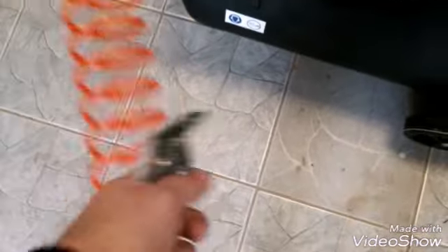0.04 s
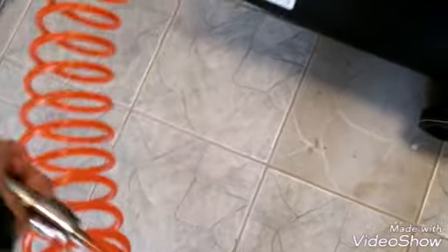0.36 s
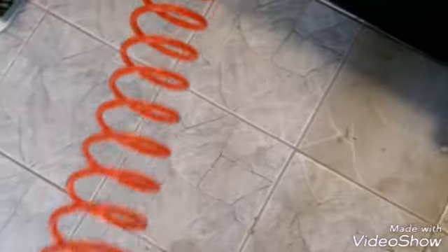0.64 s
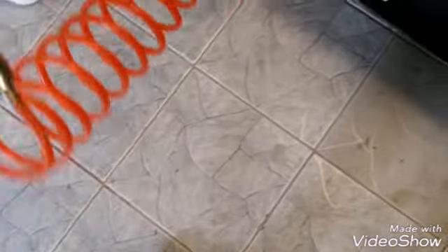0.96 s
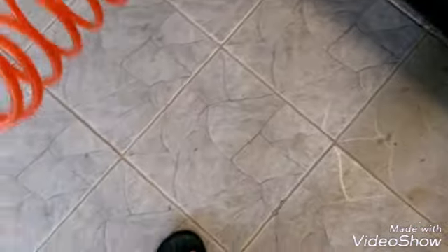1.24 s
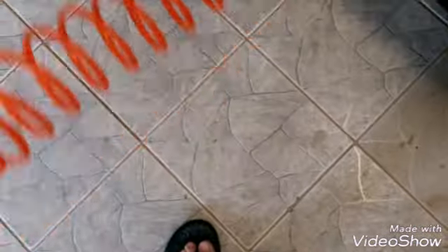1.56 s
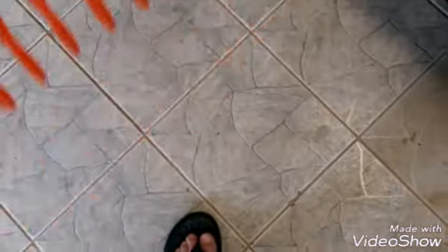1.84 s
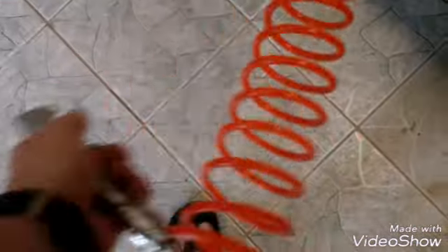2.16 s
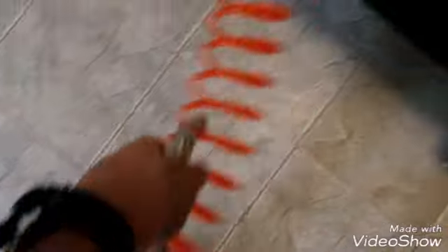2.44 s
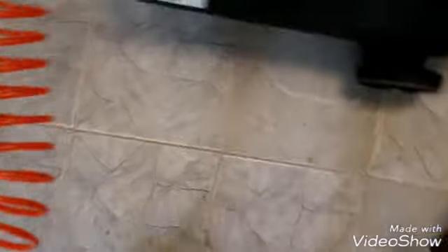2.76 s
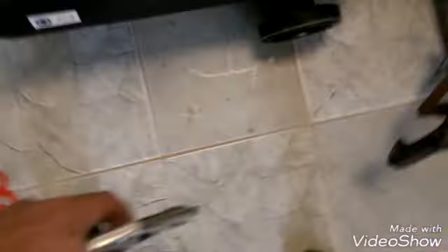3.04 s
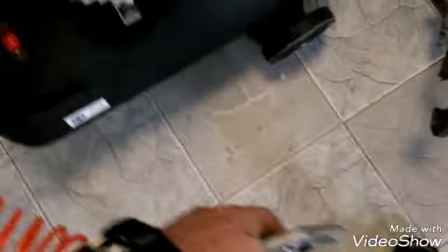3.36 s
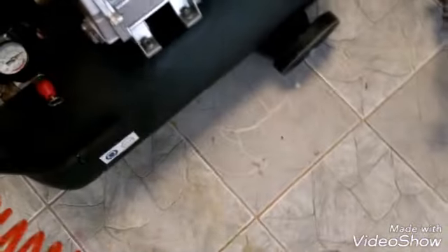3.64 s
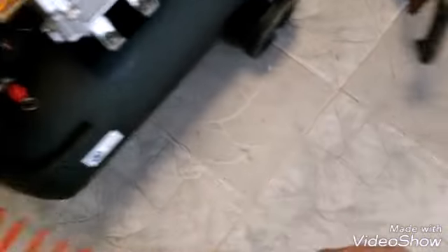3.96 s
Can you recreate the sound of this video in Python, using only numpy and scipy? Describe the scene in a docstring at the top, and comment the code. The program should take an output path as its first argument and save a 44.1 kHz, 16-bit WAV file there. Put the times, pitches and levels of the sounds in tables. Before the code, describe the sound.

An air nozzle blasts bright hiss six times in a tiled room, two longer blasts followed by two pairs of quick puffs. The nearby microphone catches a low wind rumble and two pops on its left side.

```python
"""In a tiled room, a hand-held nozzle fires short and long bursts of compressed air.
The rushing jet hisses. Its sound arrives directly, off the floor and the compressor's tank,
and from the ringing room. Stray air rumbles mostly on the left microphone port (its sound
opening) and pops on it twice. The recorder widens the stereo by subtracting from each side
a delayed copy of the other."""
import sys
import numpy as np
from scipy import signal
from scipy.fft import rfft, irfft, next_fast_len
from scipy.io import wavfile
from scipy.ndimage import uniform_filter1d, map_coordinates

SR = 44100
rng = np.random.default_rng(int(sys.argv[2]) if len(sys.argv) > 2 else 0)


def digitize_waveform(pressure):
    """Quantize a signal to 16-bit integers and store it at the path in sys.argv[1].

    Rows of a 2-D input are taken as channels; values are limited to [-1, 1].
    """
    field = np.atleast_2d(pressure).T
    bounded = np.clip(field, -1, 1)
    quanta = np.round(bounded * 32767).astype(np.int16)
    wavfile.write(sys.argv[1], SR, quanta)


N = 176400
LEAD = SR // 2  # samples of run-up, so that the room already rings
TIME = np.arange(-LEAD, N) / SR
LEFT_PORT_DB = -5  # the left port is shaded from the hiss

# Trigger pulls: start_s, stop_s, opening_s, level_db, direct_boost_db, floor_echo_ms,
# bright_pitch_hz, bright_boost_db
BURSTS = [(-.4, -0.046, 0.0036, -37.5, 0, 1.0, 6000, 2), (0.273, .702, 0.0052, -36, 0.5, 0.96, 7900, 2),
          (1.047, 2.031, 0.0058, -36.5, 0, 2.6, 5130, -0.5),
          (2.471, 2.639, 0.0053, -37, 6.5, 1.65, 5000, 4), (2.936, 3.06, 0.007, -38, 9, 0.6, 6800, 6),
          (3.71, 3.85, 0.0065, -38, 3, 2.8, 10000, 2.5), (3.99, 4.2, 0.0073, -41, 3, 2.14, 6000, 0)]
# Tone of air blowing on a port: pitch_hz, level_db
RUMBLE_TONE = [(25, -11.5), (60, -3), (130, 2.5), (220, -0.5), (450, -7.5), (900, -11), (1600, -10),
               (4000, -35)]


def amp(db):
    """Turn decibels into a volume factor."""
    return 10 ** (np.asarray(db) / 20)


def unit(x):
    """Scale a signal to an average power of 1."""
    return x / np.sqrt(np.mean(x ** 2) + 1e-20)


def along(points, hz):
    """Read between (pitch_hz, value) points on a musical (log) scale."""
    pitches, values = np.transpose(points)
    return np.interp(np.log(hz + 1), np.log(pitches + 1), values)


def wobble(per_s):
    """A smooth curve through per_s random values a second."""
    return map_coordinates(rng.standard_normal(2048), [(TIME - TIME[0]) * per_s], mode="wrap")


def filtered(x, response):
    """Scale and delay each pitch in x as response(hz) says."""
    size = x.shape[-1]
    padded = next_fast_len(size + SR // 4)
    return irfft(rfft(x, padded) * response(np.fft.rfftfreq(padded, 1 / SR)), padded)[..., :size]


def noise(tone, channels=2, size=len(TIME)):
    """A separate noise for each channel, shaped by a tone table."""
    white = rng.standard_normal((channels, size))
    return unit(filtered(white, lambda hz: amp(along(tone, hz))))


def valve(t, start, stop, opening_s, closing_s=0.011):
    """How far the valve is open, from 0 to 1; it is half open at start."""
    opening = .5 * (1 + np.tanh((t - start) / (2 * opening_s)))
    return opening * np.exp(-np.maximum(t - stop, 0) / closing_s)


def room_tone():
    """The faint, steady noise of the room."""
    # Tone of the quiet room: pitch_hz, level_db
    quiet_tone = [(25, 1), (150, -5.5), (670, -9), (1800, -4), (4600, -6.5), (10000, -17), (15000, -36)]
    return amp(-70.5) * noise(quiet_tone)


def stray_air():
    """Stray air rumbles on the ports in lumps, just after the valve opens."""
    # Strength of the draught while the valve is open: time_s, level_db
    draught = [(.3, -38.5), (.5, -43.5), (.68, -44.5), (1.15, -44.5), (1.38, -52.5), (1.75, -54.5),
               (2.0, -46), (2.47, -48), (2.53, -36), (2.62, -43), (3.0, -39.5), (3.06, -39.5),
               (3.75, -52.5), (4.0, -54.5)]
    lag_s, lump_db = 0.0046, 5.5
    blowing = sum(valve(TIME - lag_s, start, stop, opening_s, closing_s=0.0073)
                  for start, stop, opening_s, *_ in BURSTS)
    level_db = np.interp(TIME, *np.transpose(draught)) + lump_db * np.tanh(wobble(per_s=38))
    return blowing * amp(level_db) * noise(RUMBLE_TONE)


def pops():
    """The jet's edge hits a port: a quick pull and push of pressure, then swirling air."""
    # Hits on the port: start_s, level_db
    hits = [(0.374, -10.5), (2.9936, -15)]
    pitch_hz, rise_s, swirl_db = 215, 0.00026, -13.5
    swing_fade_s, swirl_fade_s = .02, 0.084  # time to fall by 60 dB
    out, t = np.zeros(len(TIME)), np.arange(SR // 10) / SR
    onset = 1 - np.exp(-t / rise_s)
    for start_s, level_db in hits:
        swing = -np.sin(2 * np.pi * pitch_hz * t) * amp(-60 * t / swing_fade_s)
        swirl = noise(RUMBLE_TONE, channels=1, size=len(t))[0] * amp(swirl_db - 60 * t / swirl_fade_s)
        out[LEAD + round(start_s * SR):][:len(t)] += amp(level_db) * onset * (swing + swirl)
    return out


def room_ring(sound):
    """The tiled room rings on; the middle pitches last longest."""
    # Time the ring takes to fall by 60 dB: pitch_hz, fade_s
    fade_times = [(150, 0.29), (1000, 0.49), (2500, 0.43), (5000, 0.45), (9000, .41), (15000, 0.34)]
    delay_s = 0.0031
    hz, t, bands = signal.stft(rng.standard_normal((2, SR * 3 // 4)), SR, nperseg=256)
    fade = amp(-60 * t / along(fade_times, hz)[:, None])
    tail = signal.istft(bands * fade, SR, nperseg=256)[1]
    tail *= np.clip(np.arange(tail.shape[1]) / SR / delay_s - 1, 0, 1)  # a short gap, then fade in
    return signal.fftconvolve(sound, tail / np.linalg.norm(tail[0]), axes=1)[:, :len(TIME)]


def echo(pair, t, delay_ms):
    """Bounced sound reaches both ports late, by a delay that can change."""
    return np.array([np.interp(t - delay_ms / 1000, t, port) for port in pair])


def nozzle_drift(pair):
    """As the nozzle moves, narrow bands of pitch swell and fade at random, alike in both ports."""
    depth_db = 1.78
    bands = signal.stft(pair, nperseg=512)[2]
    patches = uniform_filter1d(rng.standard_normal(bands.shape[1:]), size=3, axis=0)  # blur in pitch
    patches = uniform_filter1d(patches, size=16, axis=1)  # blur in time
    return signal.istft(bands * amp(depth_db * unit(patches)), nperseg=512)[1][:, :len(TIME)]


def jet_hiss():
    """Churning air hisses, following the valve and hose pressure; nearby echoes colour it."""
    # Tone of the hiss straight from the nozzle: pitch_hz, level_db
    jet_tone = [(60, -30.5), (400, -18), (900, -14.5), (1400, -11.5), (2200, -4), (3300, -4.5), (4600, -1),
                (6400, -2), (8000, -2), (9500, -5), (12000, -4), (14000, -7.5), (15300, -11)]
    # Tone of the hiss that fills the room: pitch_hz, level_db
    ring_tone = [(60, -9), (400, -16), (900, -15.5), (1500, -8.5), (2400, -1), (3300, -0.5), (4600, 0),
                 (6400, -1), (9000, -0.5), (12000, -2.5), (14000, -7), (15300, -9)]
    sag_db, sag_s = 2.5, 0.21  # the hose starts at full pressure and settles
    beam_octaves = 0.5  # width of the band that the nozzle aims at the microphone
    floor_share, tank_share, tank_ms, ring_db = 0.41, .4, 4.3, -0.5
    jet, near, flow = noise(jet_tone), np.zeros((2, len(TIME))), np.zeros(len(TIME))
    flutter_db = 0.42 * wobble(per_s=20)  # the jet is unsteady
    sway = 1 + 0.053 * wobble(per_s=3)  # the moving hand changes the echo delays
    for start, stop, opening_s, level_db, direct_db, floor_ms, bright_hz, boost_db in BURSTS:
        span = slice(*np.searchsorted(TIME, [start - .06, stop + .12]))
        t = TIME[span]
        pressure_db = sag_db * np.exp(-np.maximum(t - start, 0) / sag_s)
        level = valve(t, start, stop, opening_s) * amp(level_db + pressure_db + flutter_db[span])
        bright_band = lambda hz: np.exp(-.5 * (np.log2((hz + 1) / bright_hz) / beam_octaves) ** 2)
        beam = filtered(jet[:, span], lambda hz: amp(boost_db * bright_band(hz)))
        off_floor = floor_share * echo(beam, t, floor_ms * sway[span])
        off_tank = tank_share * echo(beam, t, tank_ms * sway[span])
        near[:, span] += level * amp(direct_db) * unit(beam + off_floor + off_tank)
        flow[span] += level
    return near + amp(ring_db) * room_ring(flow * noise(ring_tone))


def scene():
    """Sound reaches both ports, moving air mostly the left."""
    left, right = nozzle_drift(jet_hiss()) + room_tone()
    left_air, right_air = stray_air()
    left = amp(LEFT_PORT_DB) * left + left_air + pops()
    right = right + amp(-11) * right_air  # sheltered from the draught
    return np.array([left, right])[:, LEAD:]


def record(dry):
    """Widen the stereo while keeping the hiss as loud, then cut the highest treble."""
    # How much of the other side is subtracted: pitch_hz, share
    cross_feed = [(100, 0.9), (600, 0.9), (1800, 0.38), (3570, 1), (5400, 0.51), (7150, 0.42), (8900, 0.16),
                  (10700, 0.48), (12500, .3), (14500, 0.55)]
    delay_s, top_hz = .00056, 15450
    share = lambda hz: np.clip(along(cross_feed, hz), 0, 1)
    crossed = filtered(dry[::-1], lambda hz: share(hz) * np.exp(-2j * np.pi * hz * delay_s))
    shade = amp(LEFT_PORT_DB) ** 2
    # Dividing by each side's power also evens out the shaded left port.
    power = lambda hz: np.array([shade + share(hz) ** 2, 1 + shade * share(hz) ** 2])
    treble_cut = lambda hz: 1 / (1 + (hz / top_hz) ** 120)
    return filtered(dry - crossed, lambda hz: treble_cut(hz) / np.sqrt(power(hz)))


dry = scene()
out = record(dry)
digitize_waveform(out)
```